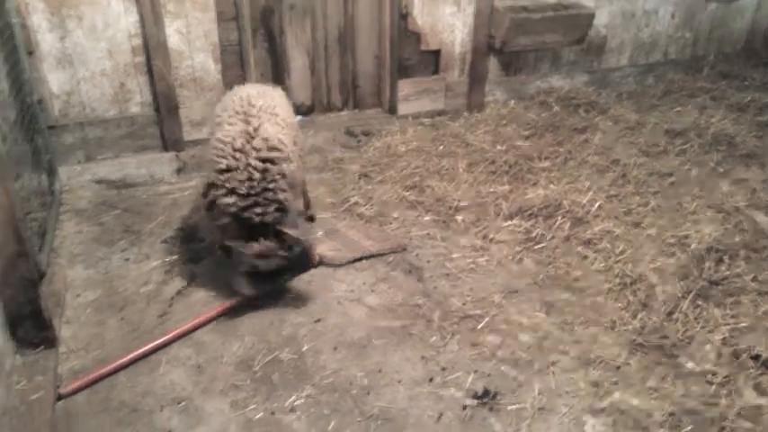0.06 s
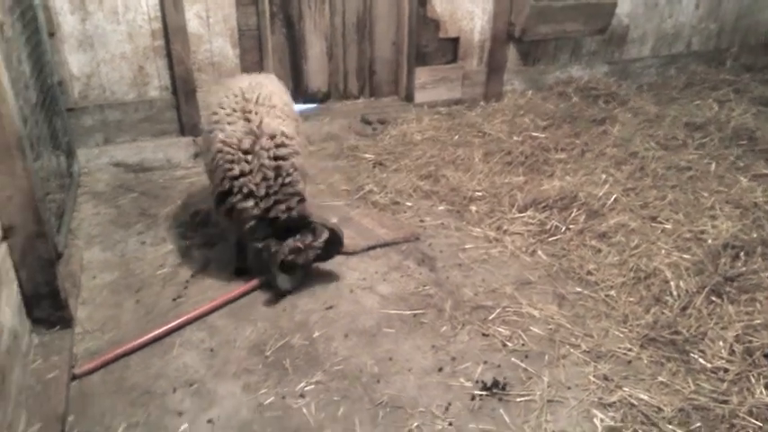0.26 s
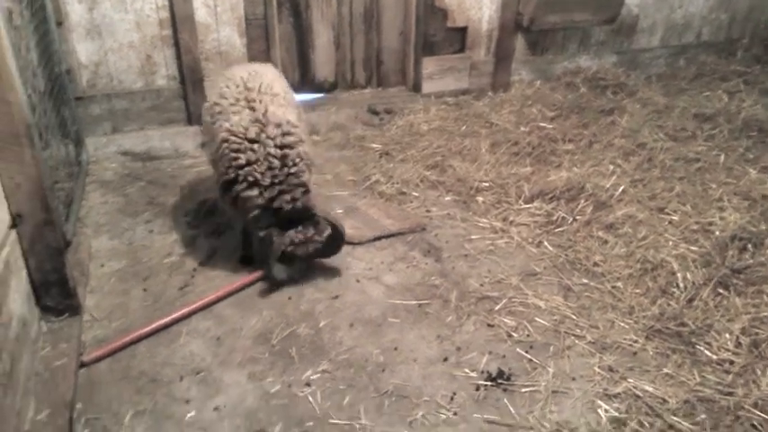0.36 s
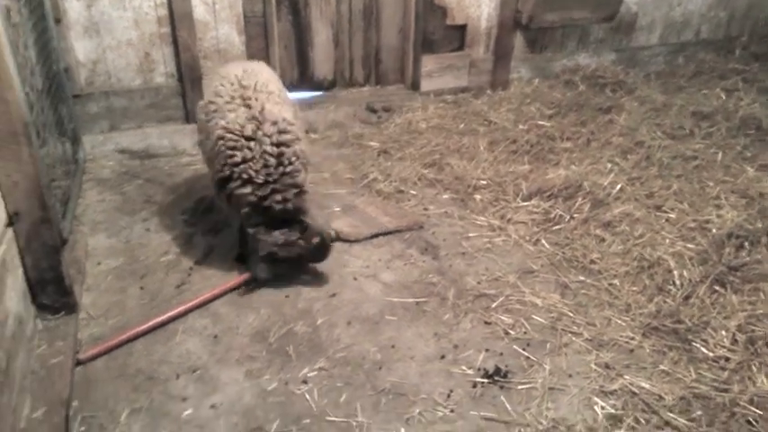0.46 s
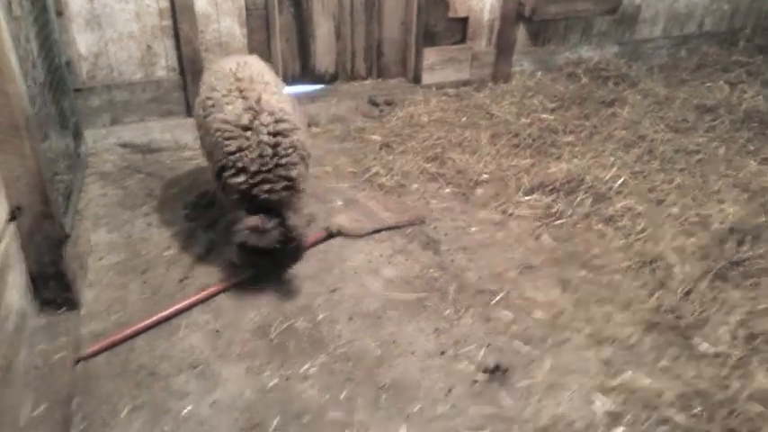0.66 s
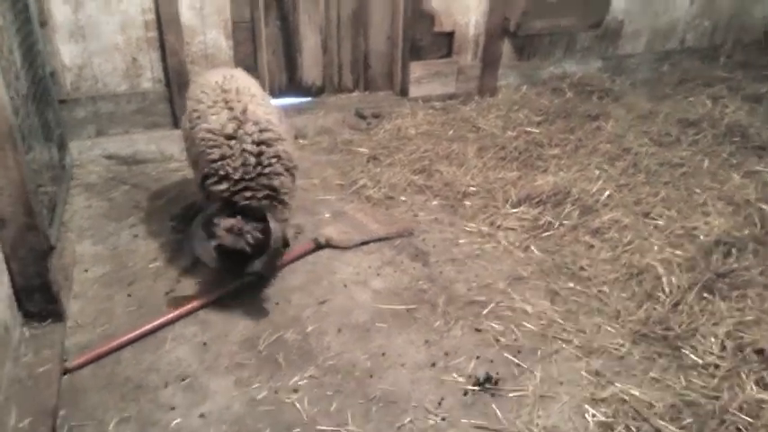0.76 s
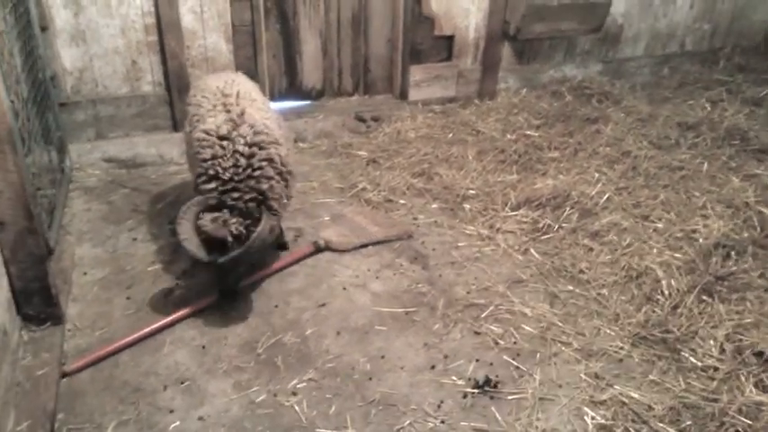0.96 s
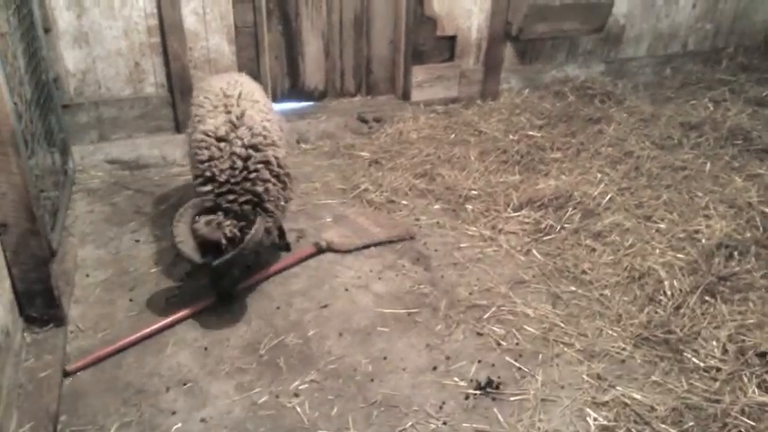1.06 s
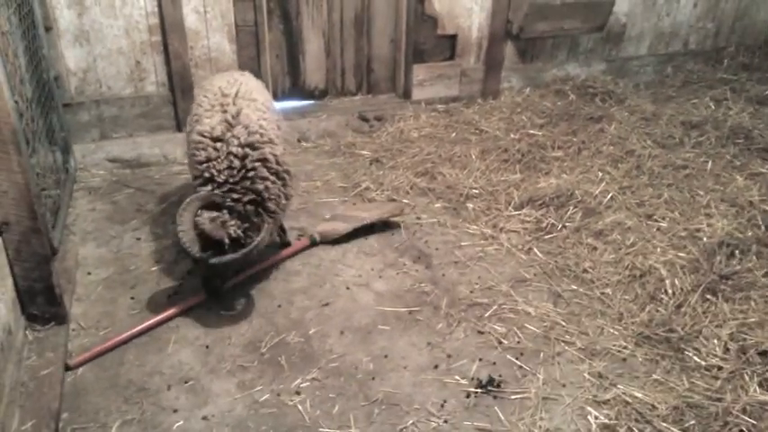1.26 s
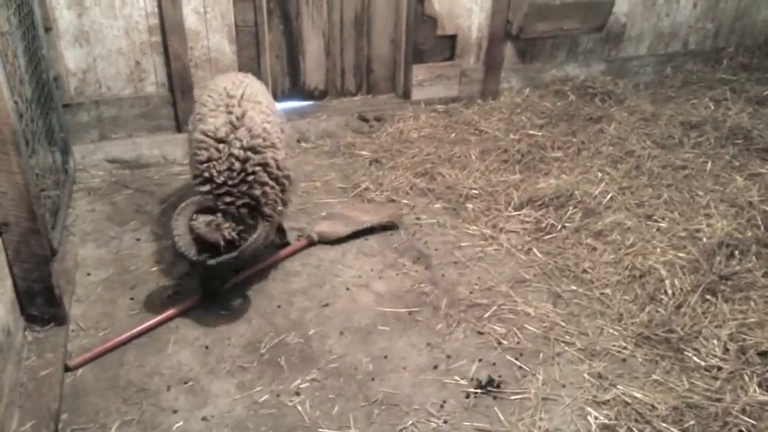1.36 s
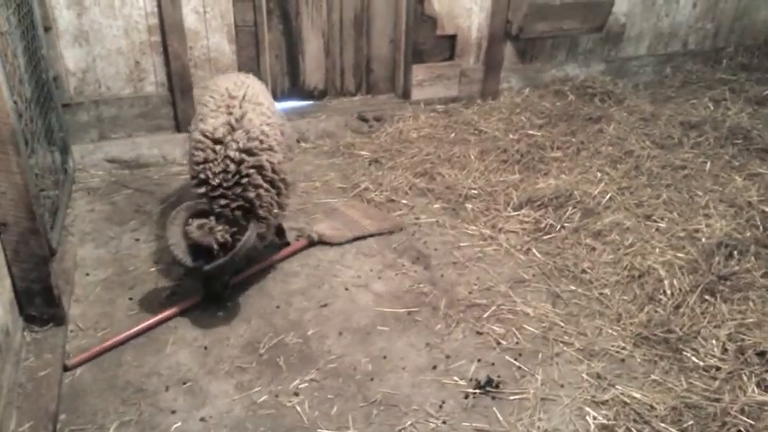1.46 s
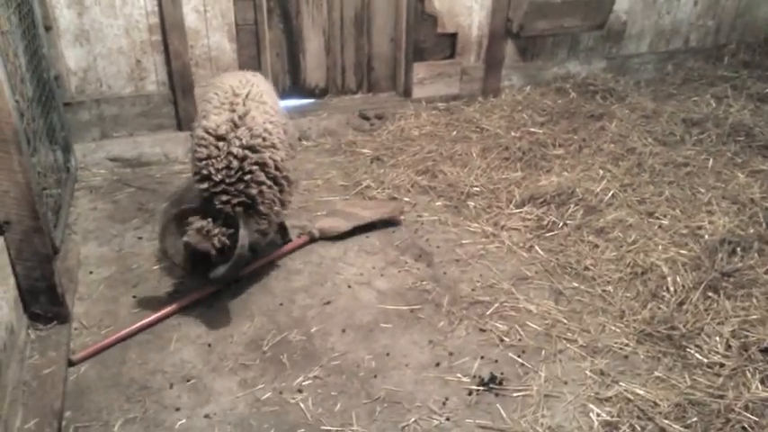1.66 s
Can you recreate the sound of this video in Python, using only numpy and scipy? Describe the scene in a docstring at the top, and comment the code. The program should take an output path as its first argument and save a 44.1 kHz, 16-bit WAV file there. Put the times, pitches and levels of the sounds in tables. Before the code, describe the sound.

A hollow tub thud booms briefly in a quiet wooden barn pen. Faint scraping, hoof scuffs and rustling straw follow, then crisp snapping stalks, one swish of broom bristles and a soft bump from the tub.

```python
"""A sheep with its head in a feed tub shoves it against a broom on the concrete floor of a barn pen.
A hoof scuffs, then the tub drops with a hollow thud that leaves the pen booming. The tub scrapes forward
through dry, rustling straw, its wall singing faintly. After a lull, stalks snap, the broom's bristles
sweep once across the floor and the tub bumps softly on its rim.
Throughout, the wooden pen adds a short, dark ring."""
import sys
import numpy as np
from scipy import signal
from scipy.fft import rfft, irfft
from scipy.io import wavfile
from scipy.ndimage import map_coordinates

SR = 44100
rng = np.random.default_rng(int(sys.argv[2]) if len(sys.argv) > 2 else 0)


def dump_mix(stems):
    """Bounce the given channels to the path in sys.argv[1] as a 16-bit WAV at rate SR."""
    frames = np.atleast_2d(stems).T  # one column per channel
    limited = np.clip(frames, -1, 1)  # hard clip at full scale
    pcm = np.round(limited * 32767).astype(np.int16)
    wavfile.write(sys.argv[1], SR, pcm)


N = 74970
TIME_S = np.arange(N) / SR
BINS_HZ = np.arange(N + 1) * SR / (2 * N)  # spectrum padded to twice the length


def undb(db):
    """Decibels to gain."""
    return 10 ** (np.asarray(db) / 20)


def unit(x):
    """Scale to rms 1."""
    return x / np.sqrt(np.mean(x ** 2))


def curve(points):
    """Draw (hz, value) points across the spectrum on a log-frequency axis."""
    hz, value = np.array(points, float).T
    return np.interp(np.log(np.maximum(BINS_HZ, 1)), np.log(hz), value)


def colour(x, eq):
    """Minimum-phase EQ through (freq_hz, gain_db) points; keeps the power of white noise."""
    cepstrum = irfft(np.log(unit(undb(curve(eq)))))
    cepstrum[1:N] *= 2
    cepstrum[N + 1:] = 0
    return irfft(rfft(x, 2 * N) * np.exp(rfft(cepstrum)))[..., :N]


def low_cut(x, hz):
    """Roll off the bass at 12 dB per octave."""
    return signal.sosfilt(signal.butter(2, hz, "high", fs=SR, output="sos"), x)


def envelope(points):
    """Fader ride through (time_s, level_db) points."""
    time_s, level_db = np.array(points, float).T
    return undb(np.interp(TIME_S, time_s, level_db))


def fade(start_s, t60_s):
    """Exponential decay from a start time."""
    age = TIME_S - start_s
    return (age >= 0) * np.exp(-np.log(1000) * np.maximum(age, 0) / t60_s)


def swells(rows, attack_s):
    """Envelope of soft-edged (start_s, level_db, t60_s) bursts."""
    return sum(undb(db) * fade(start, t60) * np.clip((TIME_S - start) / attack_s, 0, 1)
               for start, db, t60 in rows)


def grains(per_s, scatter_db):
    """Tiny clicks of uneven size: one stream in the centre, plus one for each side."""
    size = undb(scatter_db * np.minimum(rng.exponential(size=(3, N)), 4))
    clicks = (rng.random((3, N)) < per_s / SR) * size * rng.choice([-1, 1], (3, N))
    return unit(clicks[0] + clicks[1:])


def resonant(peaks):
    """Noise ringing in (pitch_hz, half_width_hz, gain_db) resonances, rms 1."""
    shape = sum(undb(db) / (1 + ((BINS_HZ - hz) / width) ** 2) for hz, width, db in peaks)
    return unit(irfft(rfft(rng.standard_normal(2 * N)) * shape))[:N]


def diffuse(wide_above_hz=550):
    """Noise from all sides: mono in the bass, wide in the treble."""
    mid, side = rfft(rng.standard_normal((2, N)), 2 * N)
    width = BINS_HZ / np.hypot(BINS_HZ, wide_above_hz)
    left_right = mid + np.array([[1], [-1]]) * width * side
    return irfft(left_right / np.sqrt(1 + width ** 2))[:, :N]


# Room tone, a low rumble with a little hiss: freq_hz, gain_db
AIR_EQ = [(25, -9), (60, -1), (150, -4), (450, -16.5), (1000, -18.5), (3500, -23), (7000, -11.5),
          (10000, -18.5), (14000, -20)]


def air(level_db=-68.5):
    """A steady bed of quiet barn air."""
    return undb(level_db) * colour(diffuse(), AIR_EQ)


# Reverb bands of the wooden pen: centre_hz, level_db, t60_s
PEN_BANDS = [(80, -19, .55), (170, -17, .5), (350, -15, .45), (700, -8, .27), (1500, -4, .16),
             (3000, -5, .15), (7000, -7, .14), (14000, -7, .11)]


def pen_ring(sound, predelay_s=.012):
    """Reflections from boards and floor; the lows ring longest."""
    spectrum = rfft(diffuse(), 2 * N)
    response = 0
    for centre_hz, db, t60 in PEN_BANDS:
        band = curve([(hz, hz == centre_hz) for hz, _, _ in PEN_BANDS])
        tail = fade(predelay_s, t60)
        response += undb(db) * irfft(spectrum * band)[:, :N] * tail / np.linalg.norm(tail)
    return signal.fftconvolve(sound[None], response, axes=1)[:, :N]


# Dark body of the pen's boom: freq_hz, gain_db
BOOM_EQ = [(35, -25.5), (80, -6), (150, 0), (350, -1), (480, -4.5), (700, -19.5), (1100, -25.5),
           (4000, -39)]


def pen_boom(start_s=.24, level_db=-32, t60_s=.55):
    """The pen's dense low resonances bloom after the thud."""
    bloom = swells([(start_s, level_db, t60_s)], attack_s=.03)
    return colour(diffuse() * bloom, BOOM_EQ)


# Hoof scuffs: start_s, level_db, t60_s
SCUFF_CUES = [(0.075, -51, 0.04), (.505, -55, 0.17), (.64, -55.5, 0.098), (1.239, -49, 0.15),
              (1.539, -47.5, 0.14)]
# Their midrange grit: freq_hz, gain_db
SCUFF_EQ = [(100, -22), (400, -33.5), (700, -1.5), (1100, 1), (1600, -6), (3000, -8), (8000, -26)]


def hooves():
    """Hooves graze the concrete in short gritty scuffs."""
    scuffs = swells(SCUFF_CUES, attack_s=.008)
    return colour(scuffs * grains(per_s=9600, scatter_db=5), SCUFF_EQ)


# Straw being pushed: time_s, level_db
RUSTLE_FADER = [(0, -52), (.05, -66.5), (.18, -66), (.22, -49.5), (.255, -50), (.29, -52.5), (.34, -53),
                (.42, -63), (.468, -47.5), (.498, -48), (.53, -40.5), (.562, -53), (.61, -53), (.66, -50.5),
                (.75, -57), (.83, -53), (.92, -77), (.98, -87), (1.088, -66.5), (1.105, -55.5), (1.23, -48),
                (1.28, -45.5), (1.4, -35.5), (1.505, -50.5), (1.555, -43.5), (1.61, -46.5), (1.7, -58)]
# Its dry sizzle: freq_hz, gain_db
RUSTLE_EQ = [(1470, -43), (2500, -12.5), (3720, -13.5), (4570, -8.5), (6090, -4), (7210, 0.5), (8170, -4),
             (9530, -12), (12000, -11.5), (13700, -6), (14500, -43.5)]


def straw_rustle():
    """Dry stalks crackle against each other."""
    crackle = grains(per_s=14000, scatter_db=6) * envelope(RUSTLE_FADER)
    return low_cut(colour(crackle, RUSTLE_EQ), hz=2040)


# Breaking stalks: start_s, level_db, t60_s, crispness (0 thick to 1 thin)
SNAP_CUES = [(.241, -39, .04, .02), (.248, -36, .05, .02), (.504, -39, .11, .35), (1.098, -49, .07, .9),
             (1.111, -47, .03, .9), (1.161, -43, .015, .7), (1.244, -43, .03, .4), (1.250, -38, .015, .5),
             (1.270, -32.5, .035, .95), (1.278, -36, .022, .85), (1.344, -31, .02, .6),
             (1.350, -30, .018, .4), (1.390, -27, .028, .25), (1.519, -38, .04, .85),
             (1.5255, -35, .015, .7)]
# Bright snap of thin stalks: freq_hz, gain_db
THIN_EQ = [(150, -45), (600, -24), (3000, -19), (5000, -10), (7300, 1), (9800, -14), (12000, -5),
           (14000, -1), (16000, -16)]
# Duller crunch of thick stalks: freq_hz, gain_db
THICK_EQ = [(150, -40), (600, -16), (2000, -10), (3500, -5), (6200, 0), (8000, -2), (10000, -14),
            (14500, -14)]


def straw_snaps():
    """Each break is a burst of clicks, a blend of thin stalks snapping and thick ones being crushed."""
    thin = sum(undb(db) * fade(start, t60) * np.sqrt(crisp) for start, db, t60, crisp in SNAP_CUES)
    thick = sum(undb(db) * fade(start, t60) * np.sqrt(1 - crisp) for start, db, t60, crisp in SNAP_CUES)
    return sum(colour(bursts * grains(per_s=15000, scatter_db=3), eq)
               for bursts, eq in [(thin, THIN_EQ), (thick, THICK_EQ)])


# The broom's stroke: time_s, level_db
SWEEP_FADER = [(1.28, -74), (1.32, -38.5), (1.365, -35), (1.415, -30.5), (1.45, -52.5), (1.5, -60.5)]
# Hiss of the bristles: freq_hz, gain_db
BRISTLE_EQ = [(150, -45), (280, -22), (600, -40), (1100, -29.5), (1800, -12), (2600, -11), (3400, -21.5),
              (4800, -7), (6000, -4), (7300, 3), (8400, -7), (9900, -26), (11500, -17.5), (13800, -19),
              (15000, -21)]
# Resonances of the broom head at mid-stroke: pitch_hz, half_width_hz, gain_db
RASP_PEAKS = [(380, 14, 0), (510, 12, -3), (685, 18, -8), (825, 18, -3), (1020, 28, -3), (1320, 60, -6)]


def broom(rasp_db=-19, glide_octaves_per_s=-.8):
    """Bristles flick over the concrete; the broom head rasps, falling in pitch as it is dragged."""
    gate = (TIME_S > SWEEP_FADER[0][0]) * (TIME_S < SWEEP_FADER[-1][0])
    stroke = envelope(SWEEP_FADER) * gate
    hiss = colour(grains(per_s=4500, scatter_db=1.5) * stroke, BRISTLE_EQ)
    middle_s = np.average(TIME_S, weights=stroke)
    pitch_ratio = 2 ** (glide_octaves_per_s * (TIME_S - middle_s))
    rasp = map_coordinates(resonant(RASP_PEAKS), [np.cumsum(pitch_ratio)], order=1, mode="mirror")
    return hiss + undb(rasp_db) * stroke * rasp


# The tub scraping over concrete: time_s, level_db
SCRAPE_FADER = [(0, -74.5), (.42, -66.5), (.47, -59.5), (.6, -63.5), (.66, -57.5), (.74, -62.5),
                (.83, -61.5), (.93, -76), (1.08, -74.5), (1.2, -57.5), (1.3, -62), (1.5, -63.5), (1.6, -57),
                (1.7, -74)]
# Coarse body of the scrape: freq_hz, gain_db
SCRAPE_EQ = [(50, -18), (110, 4), (200, 3), (360, 0), (490, 0), (620, -1.5), (1200, -3), (1700, -2),
             (2200, -0.5), (3100, -13.5), (6000, -15)]
# Faint tone of the dragged tub: time_s, level_db
SING_FADER = [(.5, -100), (.66, -66), (.82, -74.5), (.95, -75), (1.08, -84.5), (1.15, -100)]
# The wall resonance that sings: pitch_hz, half_width_hz, gain_db
SING_PEAK = [(491, 37, 0)]


def tub_slide():
    """Grit catches under the sliding tub, whose wall sings faintly."""
    grit = grains(per_s=2400, scatter_db=-1.5) * envelope(SCRAPE_FADER)
    return colour(grit, SCRAPE_EQ) + envelope(SING_FADER) * resonant(SING_PEAK)


# Soft bumps of the tub rocking on its rim: start_s, level_db, t60_s
ROCK_CUES = [(0, -58.5, 0.28), (1.145, -51, 0.5), (1.225, -56, 0.44), (1.534, -41, 0.31), (1.62, -65, 0.62)]
# Their hollow rumble: freq_hz, gain_db
ROCK_EQ = [(30, -22), (70, -11), (120, -4), (165, 0), (205, -3), (290, -9), (450, -22), (1000, -45),
           (4000, -70)]


def tub_rocking():
    """The rim rolls over the uneven floor and stirs the tub's low resonance."""
    return colour(rng.standard_normal(N) * swells(ROCK_CUES, attack_s=.022), ROCK_EQ)


# Ringing modes of the tub: pitch_hz, gain_db, t60_s
THUD_MODES = [(109.5, -8.5, 0.21), (163.4, 4, 0.094), (177, -10, 0.18), (270, 1.5, 0.11), (343.2, 0.5, .16),
              (374, -13.5, 0.13), (430, -2.5, 0.17), (568, -15.5, .12), (668, -13.5, 0.2),
              (689.4, -15, 0.16), (732, -16.5, 0.066), (885, -13.5, 0.07), (990, -13, 0.065),
              (1122, -14, 0.1), (1370, -20, .1), (1780, -9.5, .08), (1770, -19, 0.073), (2110, -19.5, 0.22)]
# Knock of its dense wall modes: freq_hz, gain_db
KNOCK_EQ = [(40, -37), (90, -3.5), (190, -0.5), (420, -1.5), (600, -17), (950, -8.5), (1300, -12.5),
            (1900, -12), (2700, -27), (6000, -46.5), (15000, -54.5)]
# The landing and two small rebounds: start_s, level_db, contact_ms
THUD_CUES = [(.2195, -21.5, 0.16), (0.2316, -34, 0.15), (.2385, -39.5, .3)]


def tub_thud(spread_s=.00294, spread_scatter_s=.00028, knock_db=-3):
    """The tub lands and chatters; each blow spreads over its walls, which radiate little deep bass."""
    lags_s = spread_s + spread_scatter_s * rng.standard_normal(len(THUD_MODES))
    ring = sum(undb(db) * np.cos(2 * np.pi * hz * (TIME_S - lag)) * fade(0, t60)
               for (hz, db, t60), lag in zip(THUD_MODES, lags_s))
    knock = colour(rng.standard_normal(N) * fade(0, t60_s=.11), KNOCK_EQ)
    walls = (ring + undb(knock_db) * knock) * np.minimum(TIME_S / spread_s, 1)
    force = np.zeros(N)
    for start_s, db, contact_ms in THUD_CUES:
        rise_s = contact_ms / 1000 / 2
        age = np.maximum(TIME_S - start_s, 0) / rise_s
        push = age ** 2 * np.exp(-2 * age)
        force += undb(db) * push / push.sum()
    return low_cut(signal.fftconvolve(force, walls)[:N], hz=90)


def scene():
    """The action reaches the left side slightly late, over the pen's ring, its boom and quiet air."""
    tub = tub_thud() + tub_rocking()
    left, right = tub + hooves() + straw_rustle() + straw_snaps() + tub_slide() + broom()
    lag_s = .00012 - .00002 * TIME_S  # the image drifts towards the middle
    late_left = map_coordinates(left, [(TIME_S - lag_s) * SR], order=5)
    return np.array([late_left, right]) + pen_ring((left + right) / 2) + pen_boom() + air()


# Tonal balance of the microphone pair: freq_hz, left_minus_right_db
BALANCE_EQ = [(60, 2.5), (200, 0), (500, -0.5), (2000, 2.5), (5000, 4.5), (7500, 1.5), (10000, -2),
              (14000, -6)]


def record(dry):
    """The two microphones differ in colour; the top is cut steeply."""
    lean_db = curve(BALANCE_EQ) / 2
    heard = irfft(rfft(dry, 2 * N) * undb([lean_db, -lean_db]))[:, :N]
    top_hz = 14700
    return signal.sosfilt(signal.ellip(10, .2, 80, top_hz, fs=SR, output="sos"), heard)


dry = scene()
out = record(dry)
dump_mix(out)
```